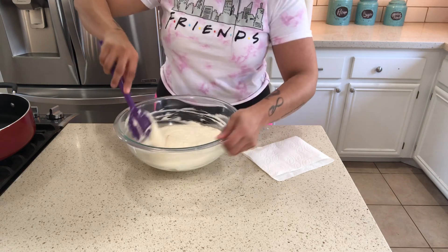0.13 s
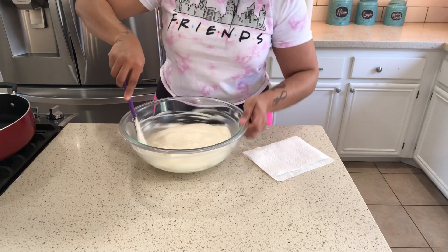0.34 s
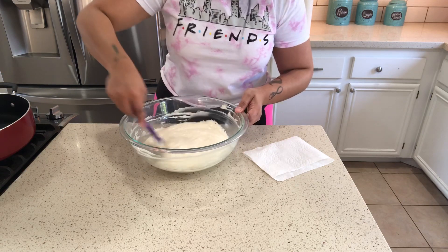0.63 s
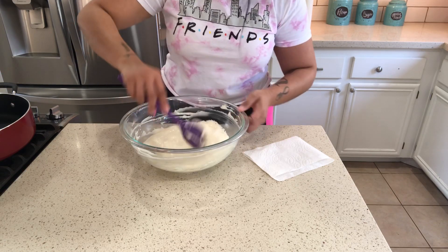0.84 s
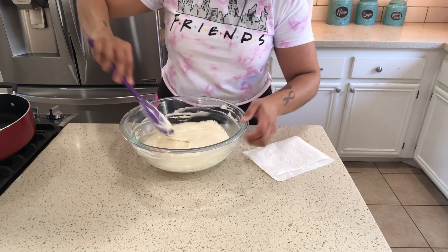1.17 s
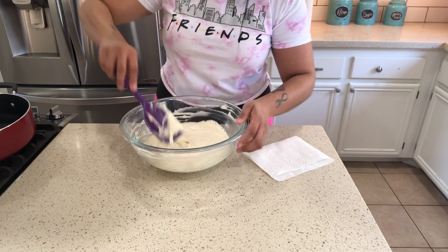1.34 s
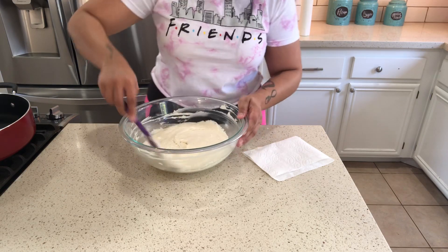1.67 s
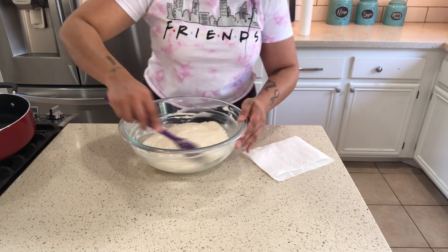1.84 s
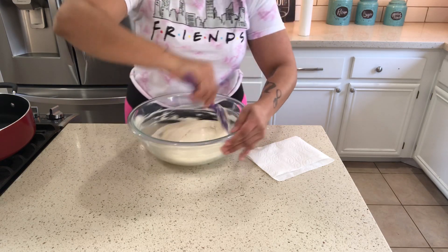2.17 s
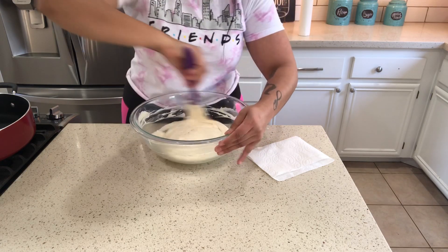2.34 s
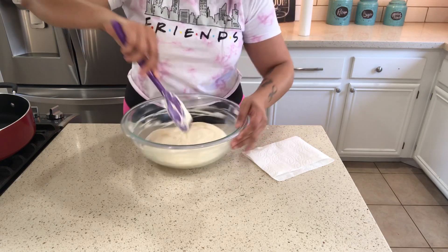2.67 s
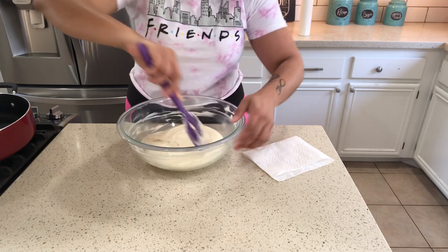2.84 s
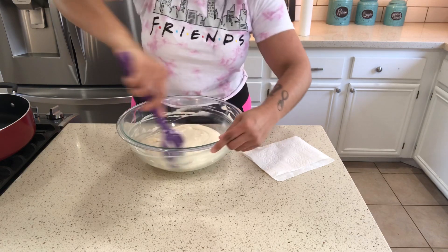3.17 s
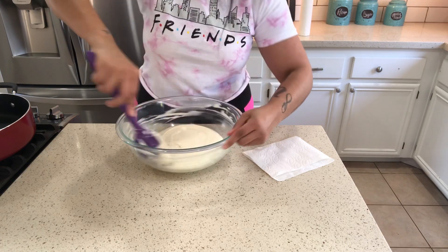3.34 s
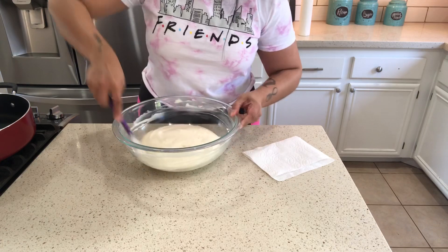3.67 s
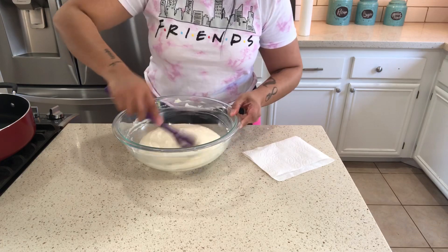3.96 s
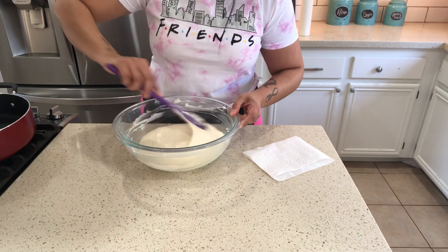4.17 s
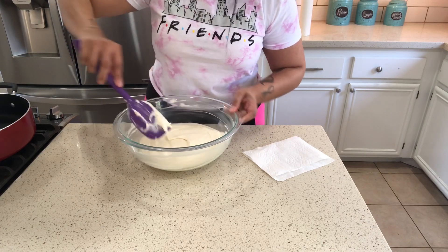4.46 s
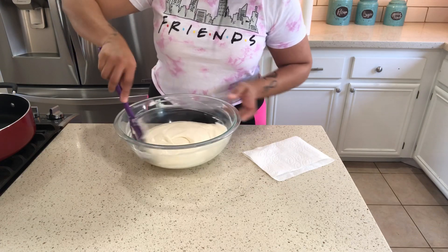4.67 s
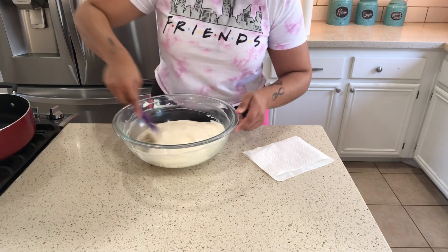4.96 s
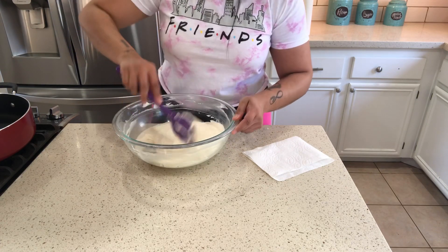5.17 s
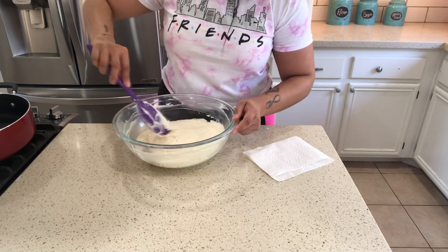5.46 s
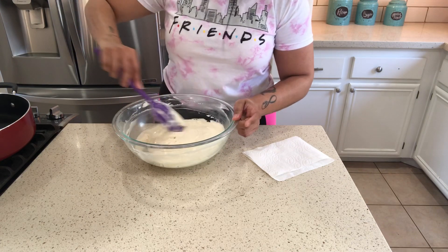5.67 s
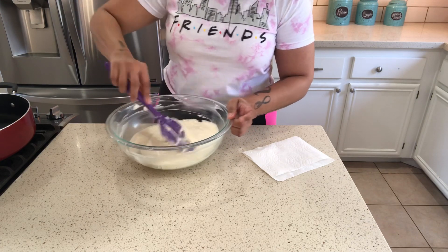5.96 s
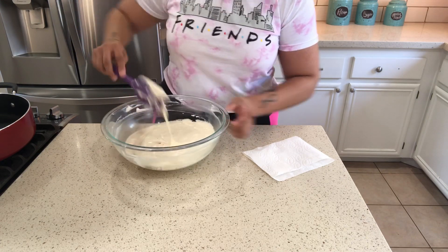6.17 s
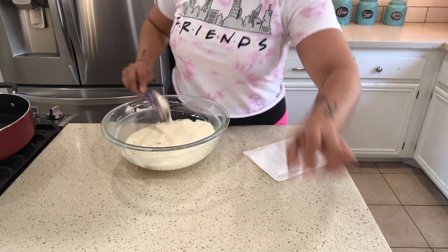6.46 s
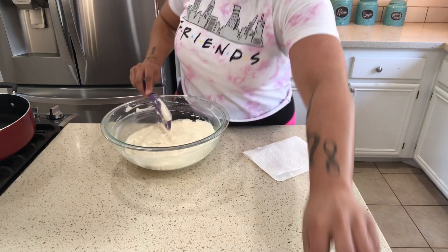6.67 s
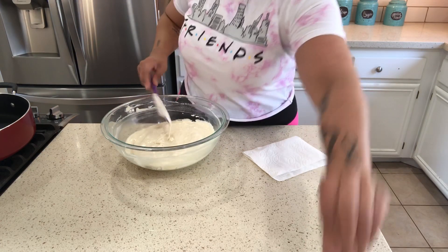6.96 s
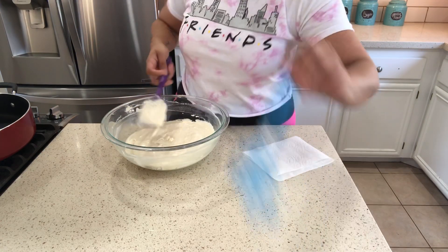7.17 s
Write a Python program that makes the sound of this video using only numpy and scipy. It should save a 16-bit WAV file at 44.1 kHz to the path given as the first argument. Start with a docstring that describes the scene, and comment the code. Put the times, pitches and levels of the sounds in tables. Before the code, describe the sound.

Soft scraping and hard woody thumps of mixing batter on a counter, over quiet motor hum, ending in the loudest sharp knocks.

```python
"""A fridge hum and room air are heard first, with a spatula folding thick batter in a glass bowl.
Wooden knocks strike almost at once in a hard, echoing kitchen; a second motor swells, then fades.
Later the blade whistles faintly, small metal tags jingle and the bowl clinks once.
Shaped noise makes air and folding; sines make the hum; bursts exciting resonances make wood, metal and
glass; noise on a sagging carrier makes the whistles."""
import sys
import numpy as np
from scipy import signal
from scipy.fft import rfft, irfft
from scipy.io import wavfile
from scipy.ndimage import uniform_filter1d

SR = 44100
rng = np.random.default_rng(int(sys.argv[2]) if len(sys.argv) > 2 else 0)


def decibels_to_gain(level_db):
    """Convert a level in decibels to a linear amplitude gain (20 dB per decade)."""
    exponent = np.asarray(level_db, float) / 20
    return 10 ** exponent


def log_audio(samples):
    """Write samples as a 16-bit WAV file to the path given in sys.argv[1]."""
    # one column per channel
    frames = np.atleast_2d(samples).T
    # limit to full scale, then quantise
    limited = np.clip(frames, -1, 1)
    pcm = np.round(limited * 32767).astype(np.int16)
    wavfile.write(sys.argv[1], SR, pcm)


N = 322812  # length in samples
BURST = 6000  # samples reserved for one excitation


def evened(x):
    """Normalization: scales a signal to rms 1."""
    return x / np.sqrt(np.mean(x ** 2) + 1e-20)


def read(points, hz):
    """Interpolation of a spectrum on a logarithmic frequency axis."""
    f, value = np.transpose(points)
    return np.interp(np.log(hz + 1), np.log(f + 1), value)


def curve(rows, column):
    """Envelope: linear interpolation of one table column at every sample."""
    rows = np.array(rows)
    return np.interp(np.arange(N) / SR, rows[:, 0], rows[:, column])


def ring(x, hz, width):
    """Simple resonance: one complex pole passes its own frequency with gain 1."""
    r = np.exp(-np.pi * width / SR)
    pole = r * np.exp(2j * np.pi * hz / SR)
    return 2 * signal.lfilter([1 - r], [1, -pole], x).real


def mode(hz, db, t60):
    """Free damped vibration: a half-second sine that falls 60 dB in t60 seconds."""
    t = np.arange(SR // 2) / SR
    return decibels_to_gain(db - 60 * t / t60) * np.sin(2 * np.pi * hz * t)


def noise(spectrum, patchy_db):
    """Spectral shaping: random short-time spectra with drifting patches, rms 1."""
    frames, hz = N // 256 + 5, np.fft.rfftfreq(1024, 1 / SR)
    real, imaginary, patches = rng.standard_normal((frames, 513, 3)).T
    patches = uniform_filter1d(patches, size=12, axis=0)  # over frequency
    patches = evened(uniform_filter1d(patches, size=10, axis=1))  # over time
    z = (real + 1j * imaginary) * decibels_to_gain(read(spectrum, hz)[:, None] + patchy_db * patches)
    return evened(signal.istft(z, nperseg=1024, noverlap=768)[1][:N])


def burst(seconds, contact=0.67):
    """Impact excitation: an initial contact and a dying scatter of even colour, energy 1."""
    fade = np.exp(-np.arange(BURST) / SR / seconds)
    puff = rng.standard_normal(BURST) * fade
    puff[0] = contact * np.linalg.norm(puff)
    z = rfft(puff)
    puff = irfft(z / abs(z)) * np.sqrt(fade)  # keep only the phases, then fade again
    return puff / np.linalg.norm(puff)


def body(x, peaks):
    """Modal superposition: steep two-pole resonances of a struck thing, with alternating signs."""
    out = 0
    for k, (hz, width, db) in enumerate(peaks):
        steep = ring(ring(x, hz, width), hz, width)
        out = out + (-1) ** k * decibels_to_gain(db) * steep / np.sqrt(width)
    return out


# Air noise spectrum: f/Hz, relative density level/dB per Hz
AIR = [(15, -33), (25, -2.5), (64, -9.5), (99, -21.5), (140, -12), (458, -23.5), (667, -28.5), (827, -33.5),
       (1810, -33), (10400, -48.5), (15600, -60)]
AIR_DB = -59  # dB rms


def room_air():
    """Stationary random noise: room air with a spectrum weighted to the bass."""
    return decibels_to_gain(AIR_DB) * noise(AIR, patchy_db=0.75)


# Steady fridge lines: f/Hz, rms level before wavering/dB
FRIDGE = [(53.8, -49.5), (118.4, -67), (263.8, -72), (317.6, -78), (425.3, -74.5), (479.1, -77),
          (839.8, -79.5), (1082, -80.5)]
# Second motor: t/s, first-order rms level/dB, second-order rms level/dB
MOTOR = [(0, -71, -79), (.6, -63.5, -59.5), (2.4, -60.5, -64.5), (3.3, -61, -63.5), (4.2, -60.5, -68),
         (4.7, -61, -70), (5.2, -80, -98)]
MOTOR_HZ = 92  # first order


def hum():
    """Line spectrum: wavering fridge lines, and two harmonic motor orders that swell and fade."""
    t = np.arange(N) / SR
    fridge = 0
    for hz, db in FRIDGE:
        waver = evened(np.interp(t, np.arange(80) / 10, rng.standard_normal(80)))
        waver_db = (.3 if hz < 70 else 3) * waver
        fridge = fridge + decibels_to_gain(db + waver_db) * np.sin(2 * np.pi * (hz * t + rng.random()))
    motor = sum(decibels_to_gain(curve(MOTOR, column=k)) * np.sin(2 * np.pi * k * MOTOR_HZ * t) for k in (1, 2))
    return np.sqrt(2) * (fridge + motor)  # peak of a sine from its rms


# Folding: t/s, level of the bowl rumbling on the counter/dB, level of the blade hissing on the glass/dB
STROKE = [(0, -62, -75), (.25, -51.5, -66.5), (.62, -67, -75), (1.2, -69, -77), (1.75, -66, -74),
          (1.95, -52.5, -66.5), (2.09, -55.5, -62), (2.26, -68.5, -73.5), (2.5, -56, -71.5),
          (3.04, -66.5, -69), (3.45, -57, -67.5), (3.7, -62.5, -67), (3.95, -65, -71.5), (4.25, -68.5, -79),
          (4.47, -57.5, -73.5), (5.0, -71.5, -72.5), (5.6, -66, -75.5), (5.83, -64.5, -68), (6.1, -61, -65),
          (6.45, -62.5, -74), (7.0, -47, -71.5), (7.22, -60, -61), (7.32, -67, -73)]
# Bowl rumble spectrum: f/Hz, relative density level/dB per Hz
RUMBLE = [(88, -51), (150, -26), (177, -23), (214, 4.5), (907, -0.5), (4000, -28), (5200, -63),
          (8800, -120)]
# Blade hiss spectrum: f/Hz, relative density level/dB per Hz
HISS = [(1180, -15), (2000, -5), (2920, -9.5), (3200, -7.5), (11100, -12), (15500, -44)]


def stroke():
    """Friction noise: the dragging blade makes lumpy rumble and grainy hiss by random modulation."""
    grain = decibels_to_gain(1.0 * evened(uniform_filter1d(rng.standard_normal(N), size=300)))
    slow = uniform_filter1d(uniform_filter1d(rng.standard_normal(N), size=1500), size=1500)
    lumps = decibels_to_gain(1.47 * evened(slow))
    rumble = decibels_to_gain(curve(STROKE, column=1)) * noise(RUMBLE, patchy_db=2.8) * lumps
    hiss = decibels_to_gain(curve(STROKE, column=2)) * noise(HISS, patchy_db=1.3) * grain
    return rumble + hiss


# Knocks: t/s, blow level/dB, then floor thump, hard edge and crack levels relative to the blow/dB
KNOCKS = [(0.006, -25.5, -7, -31, -46), (0.049, -37, -17, -26.5, -38), (0.08, -31.5, -8, -31, -46),
          (0.098, -28, -6.5, -38, -45), (0.408, -45.5, -2.5, -27, -50), (0.493, -46.5, 8.5, -25, -26),
          (1.491, -31.5, -12, -20, -42), (1.561, -29, -9, -20.5, -40.5), (2.624, -24.5, -7.5, -25.5, -46),
          (3.647, -65.5, 5, -4, 2), (4.847, -25.5, -8.5, -32, -42), (4.857, -22, -11.5, -36, -56),
          (4.87, -25, -5, -16.5, -28), (4.875, -23, -24, -26, -35), (4.898, -28.5, -21, -41, -55),
          (5.149, -48, 1, -25, -40), (5.55, -66, 7, -9, -8), (6.069, -47, 5.5, -20, -21),
          (6.117, -27, -9.5, -30, -49), (6.456, -21, -6, -23, -35.5), (6.483, -18.5, -12, -32, -59),
          (6.636, -9, -49, -22.5, -36), (6.654, -20.5, -30, -19, -37), (6.81, -10, -24, -21.5, -32.5),
          (6.829, -19.5, -32, -36, -42)]
# Dull pushes on the floor alone: t/s, level/dB
THUDS = [(.145, -30), (6.28, -44.5), (6.614, -24.5), (6.623, -21), (6.781, -26), (6.799, -21)]
# Floor resonances: f/Hz, width/Hz, level/dB
THUMP = [(83.5, 26, -2.5), (102.5, 41, 1.5), (122, 125, 1.5), (196, 82, 2.5), (262, 270, 0.5)]
# Wood resonances: f/Hz, width/Hz, level/dB
WOOD = [(298, 316, -0.5), (461, 215, 7), (660, 146, 6), (876, 164, 2), (1115, 225, -5.5)]
# Hard-edge resonances: f/Hz, width/Hz, level/dB
EDGE = [(1120, 400, 21), (1610, 430, 16), (2140, 350, 10.5), (2880, 2100, 3)]
# Crack resonances: f/Hz, width/Hz, level/dB
CRACK = [(5870, 930, 14.5), (7300, 720, 11), (8920, 920, 11.5), (10160, 700, 10), (11500, 2000, -0.5)]
# Cabinet panel modes, ringing on after each blow: f/Hz, level/dB, t60/s
PANEL = [(91, -21, 0.26), (249.7, -27, 0.23), (413.6, -22, 0.29), (610, -18.5, 0.35), (795.4, -25.5, 0.31),
         (874, -22, 0.17), (1095, -29, 0.44), (1309, -37, 0.37), (1572, -32.5, 0.17)]
SOFT_S = 0.0014  # the floor yields slowly, which rounds its thump


def knocks():
    """Impact and modal response: each blow excites floor, wood, edge and crack by its own amounts."""
    drive = np.zeros((4, N + BURST))
    decays = (0.0027, 0.015, 0.0045, 0.014)  # s: floor, wood, edge, crack
    for s, db, thump_db, edge_db, crack_db in KNOCKS:
        at = round(s * SR)
        for part, rel_db, seconds in zip(drive, (thump_db, 0, edge_db, crack_db), decays):
            part[at:at + BURST] += decibels_to_gain(db + rel_db) * burst(seconds, contact=.4)
    for s, db in THUDS:
        at = round(s * SR)
        drive[0, at:at + BURST] += decibels_to_gain(db) * burst(.005)
    soft = np.hanning(round(SOFT_S * SR) + 2)
    drive[0] = np.convolve(drive[0], soft / soft.sum(), "same")

    # each part radiates with its own efficiency in dB
    radiation = zip(drive, (THUMP, WOOD, EDGE, CRACK), (62.76, 52.14, 53.6, 53.5))
    parts = sum(decibels_to_gain(db) * body(part[:N], peaks) for part, peaks, db in radiation)
    panel = sum(mode(hz, db, t60) for hz, db, t60 in PANEL)
    return parts + signal.oaconvolve(drive[1], panel)[:N]


# Reverberation of the kitchen: f/Hz, t60/s
KITCHEN = [(80, 0.26), (210, 0.45), (560, 0.46), (1470, 0.54), (3880, 0.54), (10200, 0.28)]


def kitchen(x):
    """Reverberation: sparse reflections of random sign, each band decaying at its own rate."""
    taps = np.zeros(SR)
    at = np.arange(300, SR - 20, 20)
    taps[at + rng.integers(0, 20, len(at))] = rng.choice([-1., 1.], len(at))
    hz, t, z = signal.stft(taps, SR, nperseg=256)
    t60 = np.clip(read(KITCHEN, hz), .1, 2)[:, None]
    tail = signal.istft(z * decibels_to_gain(-60 * t / t60), SR, nperseg=256)[1]
    return signal.fftconvolve(x, tail / np.linalg.norm(tail))[:N]


# Faint whistles of the blade along the bowl wall: start t/s, length/s, level before rise and fade/dB
WHISTLES = [(1.485, 0.47, -67), (3.2, 0.81, -71.5), (5.123, 0.5, -70)]
WHISTLE_HZ, SAG_HZ_PER_S, WHISTLE_WIDTH_HZ = 4490, 350, 400
WHISTLE_RISE_S, WHISTLE_FADE_DB = 0.092, -11.5


def whistles():
    """Amplitude modulation: low-pass noise on a carrier makes a fuzzy band that swells, sags and fades."""
    fuzz = ring(ring(rng.standard_normal(N), 0, WHISTLE_WIDTH_HZ), 0, WHISTLE_WIDTH_HZ)
    out = np.zeros(N)
    for s, length, db in WHISTLES:
        t = np.clip(np.arange(N) / SR - s, 0, length)
        rise = np.minimum(t / WHISTLE_RISE_S, 1)
        fade = decibels_to_gain(db + WHISTLE_FADE_DB * (t / length) ** 2) * (t < length)
        cycles = WHISTLE_HZ * t - SAG_HZ_PER_S * t ** 2 / 2
        out += rise * fade * np.cos(2 * np.pi * cycles)
    return np.sqrt(2) * evened(fuzz) * out


# Jingles: t/s, then drive levels of low tag, middle tag, high tag and hiss/dB
JINGLES = [(1.9967, -82, -64, -75, -63), (2.774, -93, -63, -74, -84), (2.858, -75, -62, -75, -72),
           (2.9468, -50, -64, -59, -75), (2.9677, -47, -77, -71, -78), (3.0744, -61, -54, -77, -70),
           (3.091, -84, -47.5, -60.5, -72), (3.1108, -87, -55, -61, -76), (3.2083, -84, -57.5, -68, -70),
           (3.2882, -89, -46, -72, -64), (3.4355, -69, -50.5, -66.5, -57), (3.488, -70, -61.5, -69, -75),
           (3.6582, -82, -59, -65, -58), (3.794, -75, -49, -65.5, -72), (4.972, -88, -62, -78, -79),
           (5.522, -90, -68, -83, -74), (6.9513, -92, -64, -80, -76)]
# Tag modes: f/Hz, t60/s, level/dB, drive followed (0 low, 1 middle, 2 high, 3 hiss)
TAGS = [(6510, 0.019, 3.5, 0), (6530, 0.093, 5, 0), (8630, 0.041, 5, 1), (8550, 0.14, -5.5, 1),
        (9000, .12, -14, 1), (11360, 0.095, 20, 2), (11310, 0.13, -7, 2), (14100, 0.1, -14, 2),
        (15400, .08, -15, 1), (15250, .08, -8, 2), (5230, 0.38, -41, 3)]
RATTLE_S = 0.096  # decay setting of the broad hiss of each clash


def tags():
    """Beating: close pairs of metal modes ring under a short chatter; every clash also hisses."""
    drive = np.zeros((4, N + BURST))
    swell = 1 - np.exp(-np.arange(BURST) / SR / .006)  # the hiss builds up as the tags slide
    for s, *modes_db, hiss_db in JINGLES:
        at = round(s * SR)
        for part, db in zip(drive, modes_db):
            clumps = decibels_to_gain(np.repeat(5 * rng.standard_normal(20), 300))  # contacts come in clumps
            part[at:at + BURST] += decibels_to_gain(db) * burst(.03, contact=.25) * clumps
        rattle = burst(RATTLE_S, contact=0) * np.sqrt(RATTLE_S * SR)
        drive[3, at:at + BURST] += decibels_to_gain(hiss_db) * rattle * swell
    rings = sum(signal.oaconvolve(drive[k], mode(hz, db, t60))[:N] for hz, t60, db, k in TAGS)
    hiss = ring(ring(drive[3, :N], 8900, 4800), 8900, 4800)
    return rings + hiss


# Glass bowl modes: f/Hz, level/dB, t60/s
BOWL = [(1875, 8, 0.12), (2915, 8, 0.22)]
CLINK_S, CLINK_DB = 2.062, -65


def clink():
    """Modal ringing: the handle brushes the rim and two glass modes sound softly."""
    out = np.zeros(N)
    glass = sum(mode(hz, db, t60) for hz, db, t60 in BOWL)
    struck = signal.oaconvolve(glass, burst(0.026, contact=0.21))[:SR // 2]
    out[round(CLINK_S * SR):][:SR // 2] = struck
    return decibels_to_gain(CLINK_DB) * out


WOOD_ECHO_DB, METAL_ECHO_DB = -2.5, -1.5  # room echo relative to the direct sound


def scene():
    """Linear superposition: all sources and the echo sum at one microphone."""
    background = room_air() + hum()
    folding = stroke() + whistles()
    wood = knocks()
    metal = tags() + clink()
    echo = kitchen(decibels_to_gain(WOOD_ECHO_DB) * wood + decibels_to_gain(METAL_ECHO_DB) * metal)
    return (background + folding + wood + metal + echo)[None]


def top_cut(x):
    """Nothing passes above the cut-off."""
    return signal.sosfilt(signal.butter(12, 15710, fs=SR, output="sos"), x)


def record(dry):
    """High-pass filtering: a small microphone cuts the deepest bass."""
    highpass = signal.butter(4, 43, "highpass", fs=SR, output="sos")
    return top_cut(signal.sosfilt(highpass, dry))


dry = scene()
out = record(dry)
log_audio(out)
```